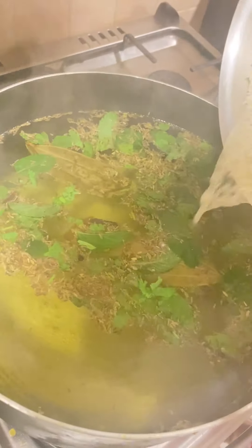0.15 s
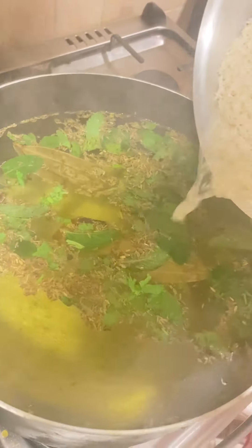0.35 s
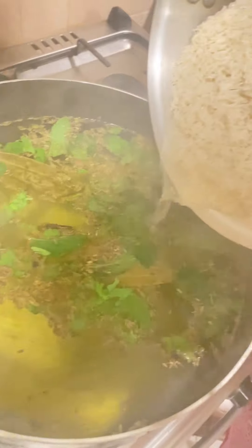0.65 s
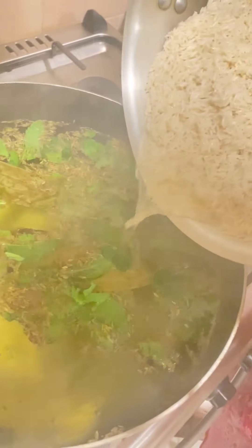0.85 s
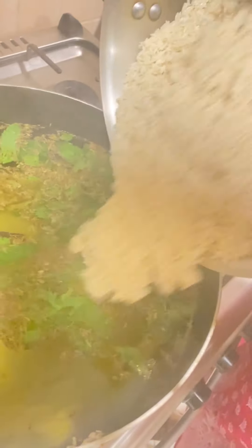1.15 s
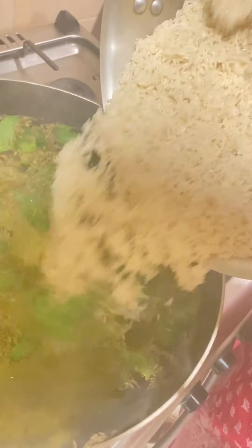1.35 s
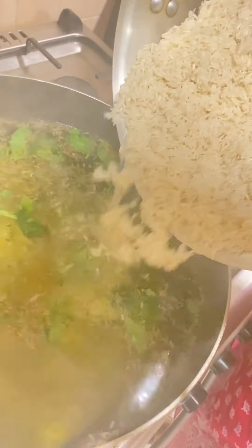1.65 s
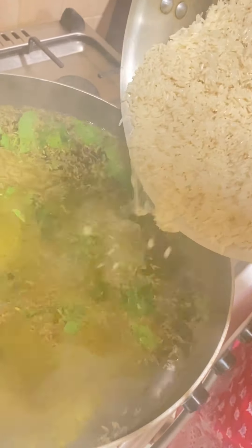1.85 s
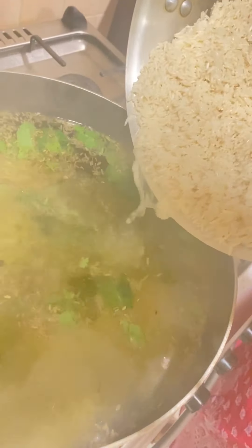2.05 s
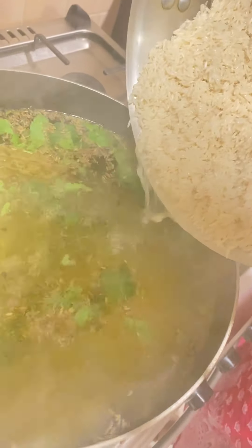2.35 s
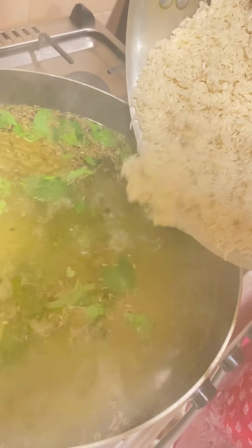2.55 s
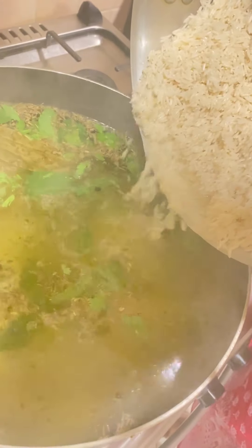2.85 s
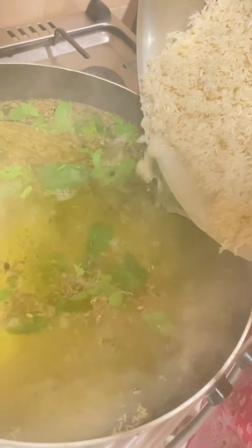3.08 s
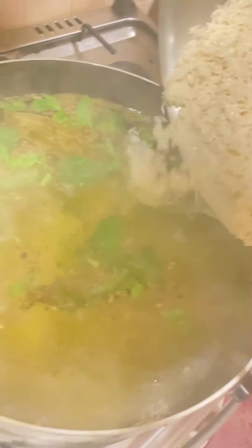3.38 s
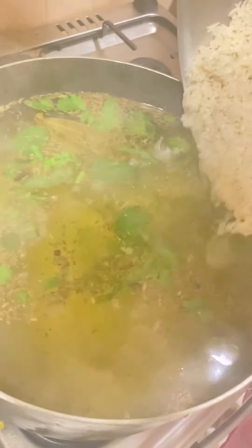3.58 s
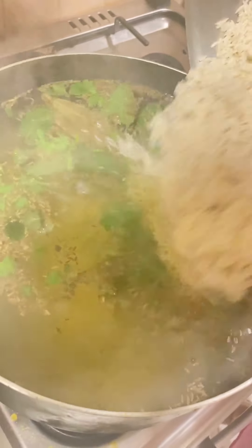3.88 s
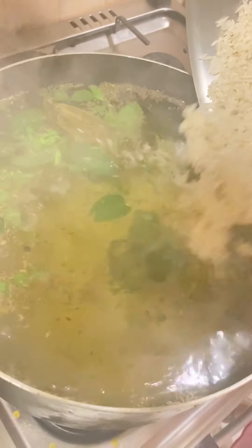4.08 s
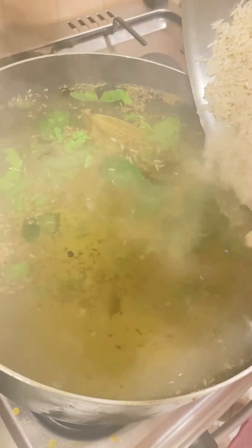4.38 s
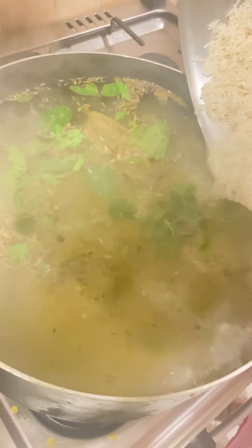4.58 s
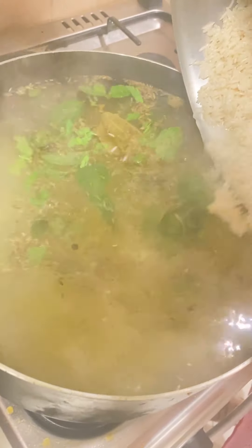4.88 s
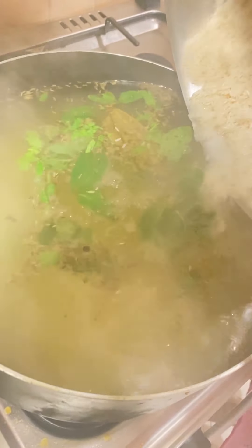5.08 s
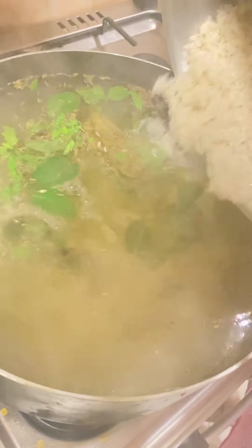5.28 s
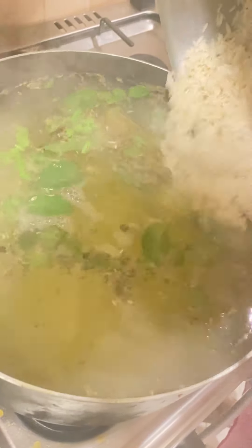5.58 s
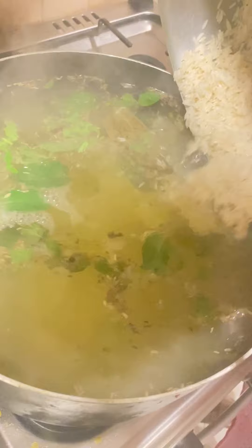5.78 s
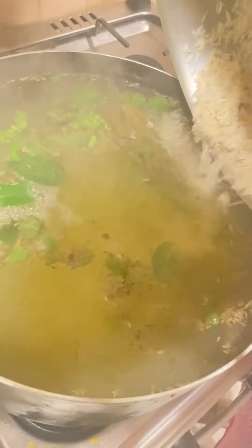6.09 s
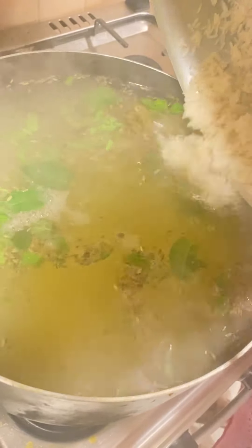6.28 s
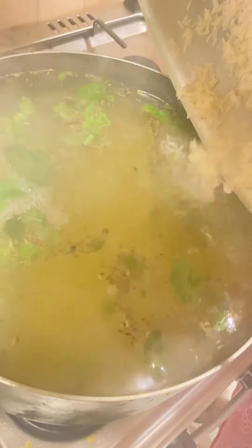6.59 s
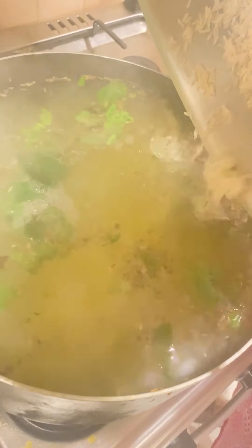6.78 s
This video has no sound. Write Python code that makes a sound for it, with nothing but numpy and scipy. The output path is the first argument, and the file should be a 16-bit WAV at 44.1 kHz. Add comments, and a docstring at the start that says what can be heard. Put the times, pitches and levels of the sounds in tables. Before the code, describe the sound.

In a small kitchen, close to a pot, a low burner drone with a boomy metallic body continues throughout, under a faint hiss of steam and fine simmering fizz. From 0 to 0.8 s there are bright little droplet ticks and a thin patter of wet grains; at about 0.9 s a soft low plop. From 1.1 s soaked rice slides in, swelling to hard, crisp slaps and a dense grainy splash at 1.4-1.55 s, fading with plops by 1.8 s. A quiet lull with ticks follows. Around 2.6-3.0 s a smaller helping patters and blips; a slap lands at 3.4 s. From 3.8 to 4.2 s a heavier rush brings wet slaps and deep gulping plops, then stops quickly. Light trickling continues near 5 s. From 5.3 to 5.9 s several looser clumps splash in, followed by smaller slaps, plops and ticks until about 6.9 s. Close stereo phone sound, short room tail.

```python
"""A small kitchen, with a phone's two microphone ports close to a pot of boiling broth on the stove. The burner
drones and the broth ticks and fizzes first, under a faint trickle of water off the bowl's lip. From about 1.1 s
soaked rice slides in from a steel bowl, in several helpings to the end: rushing grains, slapping clumps of
noise and plopping air pockets, made as damped sines that start sharp. Filtered noise makes the stove; showers
of small pings and snaps make the simmer and the grains."""
import sys
import numpy as np
from scipy import signal
from scipy.fft import rfft, irfft, next_fast_len
from scipy.io import wavfile
from scipy.ndimage import uniform_filter1d, map_coordinates

SR = 44100
rng = np.random.default_rng(int(sys.argv[2]) if len(sys.argv) > 2 else 0)


def store_wav(level_fs):
    """Save 16-bit WAV to argv[1]."""
    pcm = np.round(np.clip(np.atleast_2d(level_fs), -1, 1) * 32767)
    wavfile.write(sys.argv[1], SR, pcm.T.astype(np.int16))


N = 306054  # samples, about 6.9 s


def amp(db):
    """Decibels to gain."""
    return 10 ** (np.asarray(db) / 20)


def unit(x):
    """x at rms 1."""
    return x / np.sqrt(np.mean(x ** 2) + 1e-20)


def along(points, hz):
    """(frequency, value) points read on a log frequency axis."""
    f, v = np.transpose(points)
    return np.interp(np.log(hz + 1), np.log(f + 1), v)


def wobble(rate):
    """A smooth random curve with rate knots a second."""
    knot_values = rng.standard_normal(int(N * rate / SR) + 4)
    return map_coordinates(knot_values, [np.arange(N) * rate / SR])


def filtered(x, response):
    """x times a complex response of frequency."""
    m = next_fast_len(N + SR // 2)
    return irfft(rfft(x, m) * response(np.fft.rfftfreq(m, 1 / SR)), m)[..., :N]


def coloured(x, spectrum):
    """x shaped by a (frequency [Hz], level [dB]) spectrum."""
    return filtered(x, lambda hz: amp(along(spectrum, hz)))


def patchy(x, depth_db):
    """x with a random gain for each patch of a few hundred Hz and some milliseconds."""
    z = signal.stft(x, nperseg=256)[2]
    field = uniform_filter1d(rng.standard_normal(z.shape[1:]), size=4, axis=0)
    field = uniform_filter1d(field, size=4, axis=1)
    return signal.istft(z * amp(depth_db * unit(field)), nperseg=256)[1][:, :N]


def fade(t, t60):
    """A decay of 60 dB in t60 seconds."""
    return np.exp(-np.log(1000) * t / np.maximum(t60, 1e-4))


def arrivals(chance, pace):
    """Random times in seconds that crowd together where the pace is high."""
    return np.searchsorted(np.cumsum(pace) / np.sum(pace), chance) / SR


def place(starts, sounds):
    """Short sounds summed at their starts, each with a bounce off the pot's wall.
    Row 0 reaches both ports alike; row 1 differs with each sound's random place in the pot."""
    def laid(delay, gain):
        first = np.maximum((starts + delay) * SR, 0).astype(int)
        index = first[:, None] + np.arange(sounds.shape[1])
        return np.bincount(index.ravel(), (gain[:, None] * sounds).ravel(), N)[:N]
    lag, wall, turn, wall_turn = rng.random((len(starts), 4)).T
    alike = laid(0, np.ones(len(starts)))
    differing = laid(.0003 * lag, np.sign(turn - .5))
    bounce = laid(0.001221 + .0022 * wall, np.sign(wall_turn - .5))
    return np.array([alike, differing]) + amp([[-13], [-8]]) * bounce


def pings(starts, sizes, hz, t60, attack, bend, settle, size):
    """Ringing bubbles: damped sines that start sharp by the share bend and fall to pitch.
    Attack and settle are in cycles, size in samples."""
    t = np.arange(size) / SR
    cycles = t * hz[:, None]
    shape = fade(t, t60[:, None]) * (1 - np.exp(-cycles / attack))
    shape = shape / shape.max(axis=1, keepdims=True)
    phase = 2 * np.pi * (cycles + bend * settle * (1 - np.exp(-cycles / settle)))
    return place(starts, sizes[:, None] * shape * np.sin(phase))


def grains(count, pace, centre_hz, spread, cycles, scatter_db, size):
    """A shower of tiny pings of random time, life and strength, pitched about a centre, at rms 1."""
    when, radius, depth, life, strength = rng.random((count, 5)).T
    hz = np.clip(centre_hz * np.exp(spread * (radius + depth - 1)), 300, SR / 3)
    sizes = amp(-scatter_db * np.log(np.maximum(1 - strength, .05)))
    t60 = cycles * (.5 + life) / hz
    shower = pings(arrivals(when, pace), sizes, hz, t60, attack=1.0, bend=0.08, settle=.7, size=size)
    return unit(shower)


def clicks(count, pace, t60, scatter_db, spectrum):
    """A shower of pitchless snaps of random time and size, at rms 1."""
    when, size = rng.random((count, 2)).T
    t = np.arange(192) / SR
    sizes = amp(-scatter_db * np.log(np.maximum(1 - size, .02)))
    snaps = sizes[:, None] * fade(t, t60) * rng.standard_normal((count, len(t)))
    return unit(coloured(place(arrivals(when, pace), snaps), spectrum))


def splashes(sizes, hz, octaves, t60, attack):
    """Short bursts of noise, each in a band about its own pitch."""
    size = SR // 30
    t, f = np.arange(size) / SR, np.fft.rfftfreq(size, 1 / SR)
    band = np.exp(-.5 * (np.log2((f + 1) / hz[:, None]) / octaves) ** 2)
    noise = irfft(rfft(rng.standard_normal((len(hz), size))) * band, size)
    noise = noise / noise.std(axis=1, keepdims=True)
    return sizes[:, None] * noise * fade(t, t60) * (1 - np.exp(-t / attack))


# resonances of the pot and hob: (frequency [Hz], width [Hz], relative level [dB])
POT_RESONANCES = [(49, 20, -17), (62, 14, -8.5), (93, 6.8, -3.5), (114.1, 23.7, -6), (155, 28, -14),
                  (192.8, 19.2, -3), (213.2, 18.7, 0), (231, 10, -17.5), (262.6, 15.5, -9),
                  (283.1, 6, -4.5), (321, 28.5, -12), (380.7, 28, -17.5), (421.6, 11, -19), (481, 58, -20),
                  (643, 450, -33)]
# spectrum of escaping gas and steam: (frequency [Hz], relative level [dB])
STEAM_SPECTRUM = [(100, -29.5), (500, -1.5), (850, 7.5), (1100, 3.5), (1300, 0), (1620, -0.5),
                  (2050, -11.5), (2700, -6.5), (4800, -12), (6200, -22.5), (10000, -32.5), (13000, -21.5),
                  (16000, -33)]
# the burner's roar: (time [s], level [dB])
ROAR_LEVEL = [(0, -33), (0.3, -33), (0.55, -32.5), (1.0, -34), (1.35, -32), (1.8, -34), (2.3, -34),
              (3.0, -33.5), (3.7, -33), (4.15, -32), (4.85, -32.5), (5.2, -33), (5.5, -32.5), (5.9, -33),
              (6.3, -32), (6.75, -32), (6.94, -32)]
FLUTTER_DB = .5  # the flame's unsteadiness
STEAM_DB, STEAM_PATCH_DB = -55, 2.2


def stove():
    """The burner's turbulent roar rings in the pot and hob, over a soft hiss of gas and steam."""
    def body(f):
        power = sum(amp(db) ** 2 / (1 + ((f - hz) / width) ** 2 * 2) ** 2
                    for hz, width, db in POT_RESONANCES)
        return np.sqrt(power) * f / np.hypot(f, 25)  # little below 25 Hz
    roar = unit(filtered(rng.standard_normal((2, N)), body))
    hiss = unit(coloured(patchy(rng.standard_normal((2, N)), STEAM_PATCH_DB), STEAM_SPECTRUM))
    roar_db = np.interp(np.arange(N) / SR, *np.transpose(ROAR_LEVEL)) + FLUTTER_DB * wobble(7.8)
    steam_db = STEAM_DB + .4 * wobble(6)
    return amp(roar_db) * roar + amp(steam_db) * hiss


# spectrum of bubbles bursting at the surface: (frequency [Hz], relative level [dB])
POP_SPECTRUM = [(60, -79), (600, -33), (1500, -1), (2600, 1.5), (4500, 18), (7000, -7.5), (10000, -4),
                (13000, -4), (16000, -11)]
GURGLE_DB, FIZZ_DB, POP_DB = -68, -72.5, -73  # big, small and bursting bubbles


def simmer():
    """Big bubbles gurgle in uneven bouts while small ones fizz and burst at the surface."""
    bouts = amp(4 * wobble(5))
    gurgle = grains(count=900, pace=bouts, centre_hz=1500, spread=.5, cycles=20, scatter_db=2.6, size=1100)
    fizz = grains(count=400, pace=bouts, centre_hz=3300, spread=0.55, cycles=32, scatter_db=2.8, size=560)
    pops = clicks(count=70, pace=bouts, t60=.004, scatter_db=4.5, spectrum=POP_SPECTRUM)
    return amp(GURGLE_DB) * gurgle + amp(FIZZ_DB) * fizz + amp(POP_DB) * pops


# droplets and small bubbles that burst:
# (time [s], ring level [dB], pitch [Hz], snap over ring [dB])
BURSTS = [(0.087, -42.5, 2400, -9), (0.1907, -38.5, 6030, 4), (0.323, -56, 6750, 6), (0.3515, -52, 4400, 5),
          (0.41, -44, 8100, 8), (0.437, -49, 9450, 5), (0.472, -52, 10500, 0), (0.4992, -38, 9230, 3),
          (0.5222, -49, 8400, 8), (0.564, -48, 8800, -5), (0.591, -49, 2530, -10), (0.6252, -56.5, 6000, 6),
          (0.637, -44.5, 10800, -6), (0.66, -50, 2620, -6), (0.8973, -51.5, 5500, 6),
          (0.9343, -54, 3800, 9), (1.4768, -22.5, 5640, 6), (1.5768, -34, 5570, 1), (1.78, -48, 5000, 5),
          (1.808, -44, 6760, 5.5), (1.821, -42, 3330, 0), (2.0876, -50, 3580, -14), (2.1684, -52, 5100, 3),
          (2.1988, -47, 9000, 2.5), (2.459, -48.5, 7200, 5), (2.5788, -46, 5360, -3), (2.6, -39, 9700, 1.5),
          (2.6039, -34, 5300, -5), (2.7265, -37, 5560, 2), (2.7345, -39, 6030, 8.5),
          (2.7873, -36.5, 5640, -6), (2.793, -39, 2500, 0), (2.809, -34, 5400, -8), (2.825, -28, 5340, -5),
          (2.8353, -50, 6900, 8.5), (2.883, -46, 9200, 0), (2.907, -50, 6500, 10.5), (2.9875, -51, 5960, 5),
          (3.0282, -46.5, 5500, 3), (3.0375, -54, 7000, -3), (3.101, -47.5, 2820, -8),
          (3.1524, -36, 2570, -9), (3.156, -43, 4180, -10), (3.1745, -46, 6730, -1),
          (3.4715, -43.5, 5400, 8), (3.483, -43, 3900, 2), (3.5048, -34.5, 2830, -1),
          (3.5275, -44.5, 5360, -6), (3.579, -48, 4030, -10), (3.803, -32, 6300, -4),
          (3.904, -30, 5270, -4), (3.92, -32, 3080, 0), (4.0202, -32, 4550, 0), (4.078, -30.5, 5230, -3),
          (4.138, -42, 6400, -11.5), (4.149, -37, 2900, 2), (4.228, -43, 8000, 3.5), (4.269, -53, 8500, 3),
          (4.6318, -45, 3800, -23), (4.696, -36, 5100, -43), (4.817, -52.5, 6900, 6.5),
          (4.839, -41, 5500, -11), (4.8874, -49.5, 6240, 13), (4.8905, -43, 2200, -12),
          (4.914, -47.5, 6840, 6.5), (4.9865, -45.5, 9400, -2), (5.1005, -42.5, 6140, -2),
          (5.2049, -48, 5000, 0), (5.336, -45, 8000, -2), (5.511, -39, 4000, -1), (5.9366, -42, 5760, 6.5),
          (5.938, -34.5, 8800, 0), (6.0169, -45.5, 7700, 7.5), (6.105, -41.5, 4220, -13),
          (6.111, -43, 3050, -8), (6.168, -41, 3320, 4.5), (6.194, -42.5, 7340, 0.5),
          (6.2044, -49, 5400, 0), (6.336, -41.5, 4350, -18), (6.36, -49, 5500, -6), (6.371, -47, 4500, -13),
          (6.412, -50.5, 10000, -6), (6.572, -42, 6550, -15), (6.5986, -37.5, 5140, 2),
          (6.601, -33, 8740, -0.5), (6.6793, -43.5, 6540, 9), (6.755, -46.5, 8300, 2),
          (6.776, -49.5, 6100, 4), (6.857, -45.5, 3200, 9)]
SNAP_OCTAVES, SNAP_T60_S = .6, .008


def ticks():
    """Droplets and bursting films: a few bright cycles with a snap at the start."""
    s, db, hz, snap_db = np.transpose(BURSTS)
    snap = splashes(amp(db + snap_db), hz, SNAP_OCTAVES, SNAP_T60_S, attack=0.00022)
    ring = pings(s, amp(db), hz, 30 / hz, attack=2, bend=0.15, settle=.7, size=700)
    return ring + place(s, snap)


# air pockets that ring under the surface:
# (time [s], ring level [dB], pitch [Hz], splash over ring [dB])
AIR_POCKETS = [(0.896, -30.5, 980, -13), (0.9, -29.5, 650, -8), (1.171, -33, 2840, -3),
               (1.188, -37, 1150, -3), (1.233, -36, 1970, -6), (1.2588, -36, 1950, -6),
               (1.2603, -27.5, 1035, -1), (1.296, -35.5, 2220, -7), (1.388, -32, 2900, -5),
               (1.424, -32, 1560, 0), (1.466, -26, 2170, 6.5), (1.51, -29.5, 3300, 1),
               (1.535, -27, 2520, -11), (1.539, -30.5, 886, -17), (1.564, -38.5, 3100, -1),
               (1.614, -35, 3200, 1), (1.657, -35, 2920, -11), (1.695, -49, 3100, 0),
               (1.7666, -28, 1150, -6), (2.762, -35.5, 2300, -3), (2.79, -37, 1140, -12),
               (2.906, -33, 1300, -3.5), (2.977, -30, 1190, -9), (3.397, -45, 2530, -1),
               (3.579, -37.5, 2350, 2), (3.61, -32, 2670, -8), (3.803, -29, 2470, -2),
               (3.839, -32, 2500, -4), (3.9957, -30.5, 1370, -17), (4.023, -25.5, 886, -9),
               (4.027, -42, 726, -6), (4.0782, -29.5, 1630, -4.5), (4.141, -39, 1330, -2),
               (4.816, -40.5, 1600, -11), (5.084, -42.5, 1460, -9), (5.347, -33, 2630, -4.5),
               (5.439, -44, 2100, 4), (5.491, -33, 2900, -2), (5.521, -41, 1360, -7), (5.566, -43, 2700, 3),
               (5.614, -37, 2540, -5), (5.64, -37, 2400, -3), (5.754, -39, 2510, -1), (5.808, -38, 2200, 0),
               (5.849, -43, 1800, 2), (5.9, -32.5, 1610, 2), (6.024, -38, 2250, -12),
               (6.283, -39, 1850, -14), (6.508, -45, 1900, -9), (6.555, -44, 2010, -3),
               (6.688, -45, 2170, -15)]
PLOP_CYCLES = 16  # cycles in which a ring dies by 60 dB
BEND_HZ, SETTLE_CYCLES = 401, 0.69  # big pockets bend most: one at BEND_HZ starts an octave sharp
SPLASH_RATIO, SPLASH_OCTAVES, SPLASH_T60_S = 1.3, .5, .019  # ratio of splash pitch to ring pitch


def plops():
    """The surface splashes open, and the air dragged under rings briefly; big pockets fall most in pitch."""
    s, db, hz, splash_db = np.transpose(AIR_POCKETS)
    splash = splashes(amp(db + splash_db), hz * SPLASH_RATIO, SPLASH_OCTAVES, SPLASH_T60_S, attack=0.0015)
    bend = (BEND_HZ / hz[:, None]) ** 2
    ring = pings(s, amp(db), hz, PLOP_CYCLES / hz, attack=1, bend=bend, settle=SETTLE_CYCLES, size=3000)
    # all ring under the stream, so they reach the ports from one place
    one_place = ring[0] * amp([[0], [-9]])
    return one_place + place(s, splash)


# spectrum of a slap on the broth: (frequency [Hz], relative level [dB])
SLAP_SPECTRUM = [(60, -61), (350, -25), (750, -2), (1500, 0.5), (2600, -10), (4000, 2), (5800, 0),
                 (8000, -4), (12000, -3.5), (16000, -18.5)]
# clumps that slap the surface: (time [s], level [dB], time taken to go under [s])
CLUMP_LANDINGS = [(0.836, -39.5, 0.037), (1.079, -41.5, .025), (1.17, -40.5, 0.042), (1.4085, -22, .018),
                  (1.422, -23.5, .025), (1.4595, -29, .025), (1.474, -18, .018), (1.5149, -24.5, .025),
                  (1.534, -40.5, 0.014), (1.572, -37, .025), (1.636, -33.5, .025), (1.654, -38, .02),
                  (1.674, -40.5, .04), (2.759, -37, .02), (3.393, -27.5, .022), (3.412, -39, 0.03),
                  (3.5787, -39, 0.02), (3.8003, -25, 0.023), (4.016, -21.5, 0.034), (4.086, -25.5, 0.064),
                  (4.1385, -24.5, 0.025), (4.167, -33.5, .04), (5.09, -41, 0.041), (5.198, -41, 0.053),
                  (5.349, -29, 0.035), (5.442, -35, 0.027), (5.484, -30, 0.049), (5.507, -33.5, 0.032),
                  (5.549, -30.5, 0.012), (5.561, -29.5, 0.04), (5.627, -29.5, 0.079), (5.745, -39, 0.046),
                  (5.8056, -31, 0.068), (5.849, -34.5, 0.034), (6.022, -28.5, 0.047), (6.08, -41, 0.074),
                  (6.272, -39, 0.062), (6.366, -41, 0.034), (6.502, -35, 0.035), (6.682, -37.5, 0.029),
                  (6.765, -44, 0.098), (6.855, -39, 0.031)]
SLAP_RISE = 0.18  # rise time as a share of the time taken to go under


def clumps():
    """Each clump lands with a grainy slap: a firm one at once, a loose one drawn out."""
    s, db, length = np.transpose(CLUMP_LANDINGS)[:, :, None]
    t = np.arange(SR // 10) / SR
    shape = fade(t, length) * (1 - np.exp(-t / (SLAP_RISE * length)))
    grain_db = 3.5 * unit(uniform_filter1d(rng.standard_normal(shape.shape), size=50, axis=1))
    bursts = amp(db + 3.0 + grain_db) * shape * rng.standard_normal(shape.shape)
    return coloured(place(s[:, 0], bursts), SLAP_SPECTRUM)


SCATTER_DB, SCATTER_T60_S = -13, 0.14  # loose grains, relative to their clump
SCATTER_MAX_DB = -51.5  # a big clump holds together and sheds no more than this


def loose():
    """Gain of the loose grains that rain down after each clump."""
    s, db, _ = np.transpose(CLUMP_LANDINGS)
    t = np.arange(SR // 5) / SR
    shed = amp(np.minimum(db + SCATTER_DB, SCATTER_MAX_DB))
    impulses = np.bincount((s * SR).astype(int), shed, N)[:N]
    return signal.fftconvolve(impulses, fade(t, SCATTER_T60_S))[:N]


# helpings of rice that slide off the bowl, the first a faint trickle of water off its lip: (start [s], onset
# [s], time from start to peak [s], peak level [dB], dying away [dB/s], spray over bubbling [dB])
RICE_HELPINGS = [(0.18, 0.0092, 0.21, -67.5, 35, -6), (1.14, 0.04, 0.37, -44.5, 50, -7),
                 (2.59, 0.016, 0.24, -57.5, 36, -5), (3.31, 0.027, 0.17, -57, 43, -1.5),
                 (3.689, 0.083, 0.45, -44, 138, -2), (4.8, 0.1, 0.35, -63, 20, -4),
                 (5.3, 0.11, 0.25, -50.5, 14.5, -7), (6.015, 0.018, 0.034, -58, 30, -25),
                 (6.259, 0.02, 0.037, -72, 130.5, -18.5)]
SWELL_DB_PER_S = 14.5  # a helping gathers pace as it slides
DRIP_DB = -79  # water that keeps running off the bowl


def flow():
    """Gain of the bubbling and of the spray: each helping sets in, swells, and dies away."""
    s, onset, length, db, dying, spray_db = np.transpose(RICE_HELPINGS)[:, :, None]
    t = np.arange(N) / SR - s
    below_peak_db = np.maximum(SWELL_DB_PER_S * (length - t), dying * (t - length))
    gain = np.clip(t / onset, 0, 1) * amp(db - below_peak_db)
    bubbling = np.linalg.norm(gain, axis=0)
    spray = np.linalg.norm(gain * amp(spray_db), axis=0) + amp(DRIP_DB)
    return bubbling, spray


def knots(count, pace):
    """Knots of stuck grains splash in at random, each with its own pitch, at rms 1."""
    when, radius, strength = rng.random((count, 3)).T
    hz = 2100 * 2 ** (1.9 * radius)
    bursts = splashes(amp(13 * strength ** 2), hz, octaves=.17, t60=.021, attack=.0005)
    return unit(place(arrivals(when, pace), bursts))


# spectrum of the dense wash of grains: (frequency [Hz], relative level [dB])
WASH_SPECTRUM = [(40, -79), (300, -21), (700, 9.5), (1100, -2), (1800, -5.5), (2500, 3.5), (3800, 3),
                 (5200, 4), (7000, -6.5), (10000, -4.5), (13000, -37), (16000, -44.5)]
# spectrum of the crackling spray: (frequency [Hz], relative level [dB])
SPRAY_SPECTRUM = [(60, -83.5), (600, -21.5), (1500, 3), (2600, -16.5), (4500, 4.5), (7000, -3),
                  (10000, 0.5), (12000, -0.5), (13500, -7), (16000, -25)]
CROWDING = .75  # power by which grains crowd as the flow grows
WASH_PATCH_DB = 4.5
# knots: level at the flow KNOT_AT_DB; a power under 1 makes them stand out more in a thin flow
KNOT_DB, KNOT_LAW, KNOT_AT_DB = -60.5, 0.94, -49.5


def rice():
    """Wet grains rush in by uneven spurts: each traps a tiny bubble and throws spray; some fall in knots.
    A thin flow is single grains, a thick one a dense patter."""
    bubbling_gain, spray_gain = np.hypot(flow(), loose())
    pace = (bubbling_gain + spray_gain) ** CROWDING
    per_grain = np.sqrt(pace.mean() / pace)  # offsets the loudness that crowding adds
    spurts_db = 1.4 * wobble(32) + .5 * wobble(160)
    patter = per_grain * grains(count=3600, pace=pace, centre_hz=3800, spread=.75, cycles=21,
                                scatter_db=3.8, size=480)
    crackle = per_grain * clicks(count=3600, pace=pace, t60=0.006, scatter_db=2.1, spectrum=SPRAY_SPECTRUM)
    wash = unit(coloured(patchy(rng.standard_normal((2, N)), WASH_PATCH_DB), WASH_SPECTRUM))
    bubbling = amp(-2.3) * patter + amp(-5) * wash
    stream = amp(spurts_db) * (bubbling_gain * bubbling + spray_gain * crackle)
    knot_gain = per_grain * amp(KNOT_DB) * (bubbling_gain / amp(KNOT_AT_DB)) ** KNOT_LAW
    return stream + knot_gain * knots(count=420, pace=pace)


# the small room's tail: (frequency [Hz], time to fall by 60 dB [s])
ROOM_T60 = [(200, 0.06), (2000, 0.22), (12000, 0.0094)]
OVERHEAD_DB, ROOM_DB = -13, -17  # echo and tail, relative to the direct sound


def kitchen(x):
    """The direct sound, an echo from overhead and the short tail of the room."""
    def energy_one(h):
        return h / np.linalg.norm(h, axis=1, keepdims=True)
    hz, t, z = signal.stft(rng.standard_normal((2, SR // 3)), SR, nperseg=256)
    tail = signal.istft(z * fade(t, along(ROOM_T60, hz)[:, None]), SR, nperseg=256)[1]
    t = np.arange(tail.shape[1]) / SR
    # a brief burst of noise about 9 ms after the direct sound
    overhead = energy_one(rng.standard_normal(tail.shape) * fade(np.abs(t - .009), 0.0008))
    reflections = amp(OVERHEAD_DB) * overhead + amp(ROOM_DB) * energy_one(tail)
    return x + signal.fftconvolve(x, reflections, axes=1)[:, :N]


# how alike the two microphone ports hear: (frequency [Hz], likeness [0-1])
PORT_LIKENESS = [(60, .995), (200, .995), (350, .97), (560, .72), (900, .88), (1800, .45), (3200, .52),
                 (5400, .55), (6300, .76), (10000, .82), (14000, .97)]
# phase by which the left port leads: (frequency [Hz], lead [rad])
PORT_LEAD = [(0, 0), (520, -0.4), (780, -2.9), (920, -3.6), (1200, -4.3), (1600, -5.1), (1980, -5.4),
             (2400, -4.7), (2840, -4.1), (3190, -4.25), (3700, -4.45), (4910, -3.7), (5170, -3.6),
             (5940, -5.7), (7750, -4.8), (9820, -4.3), (12500, -3.2), (16000, -3.1)]
# level between the ports: (frequency [Hz], left minus right [dB])
PORT_TILT = [(110, 0), (200, 0), (380, -2), (600, -12), (850, -0.5), (2000, 0), (3700, -3), (7000, 0)]


def ports(pair):
    """Two microphone ports share part of the sound; their phase and level differ with frequency."""
    def mix(hz):
        turn = np.arccos(np.clip(along(PORT_LIKENESS, hz), 0, 1)) / 2
        return np.array([np.cos(turn), np.sin(turn)])

    def left_and_right(hz):
        half_lead = np.exp(.5j * np.interp(hz, *np.transpose(PORT_LEAD)))
        half = amp(along(PORT_TILT, hz) / 2) * half_lead
        return np.array([half, 1 / half])
    shared, apart = filtered(pair, mix)
    return filtered(np.array([shared + apart, shared - apart]), left_and_right)


def scene():
    """The pot's sounds in the kitchen, over the stove, as they reach the microphone ports."""
    pot = rice() + clumps() + plops() + ticks() + simmer()
    return ports(kitchen(pot) + stove())


TOP_HZ = 16150


def record(dry):
    """The phone keeps nothing above its band limit."""
    return filtered(dry, lambda hz: hz < TOP_HZ)


dry = scene()
out = record(dry)
store_wav(out)
```